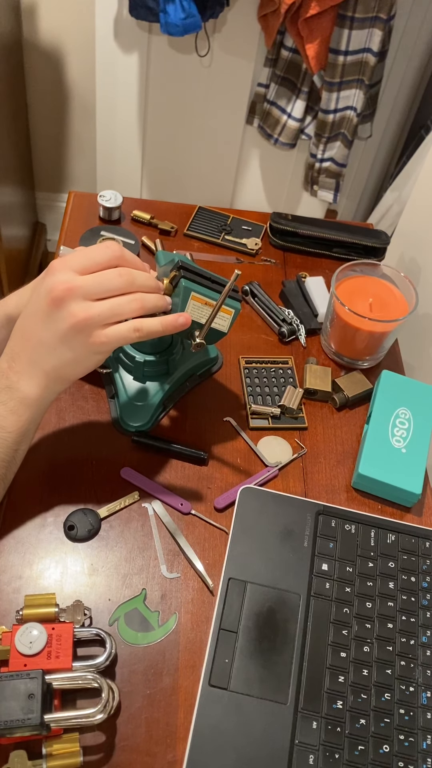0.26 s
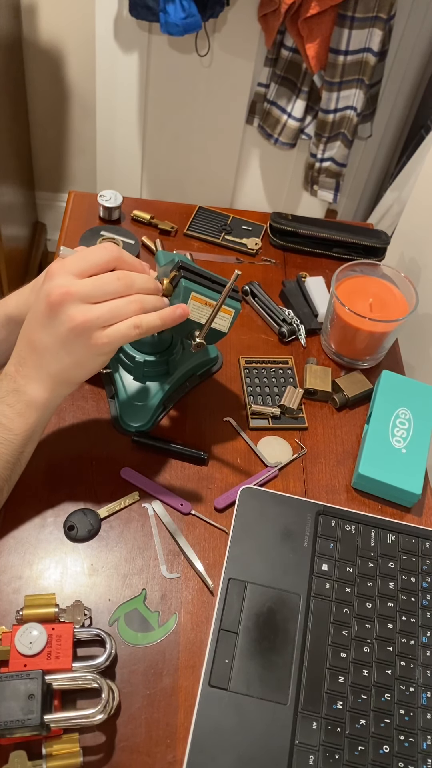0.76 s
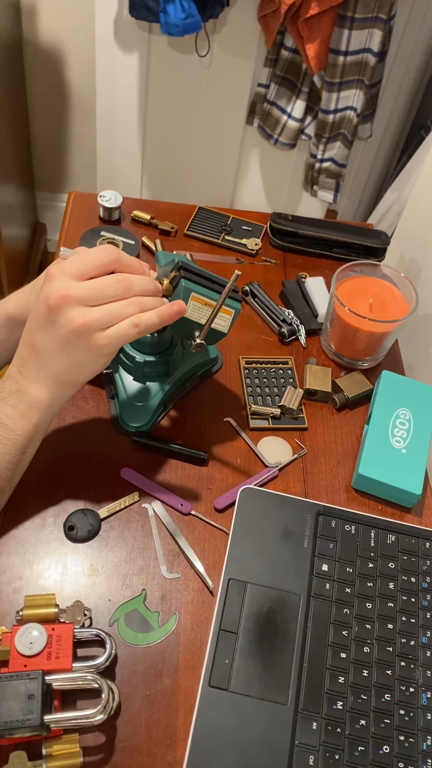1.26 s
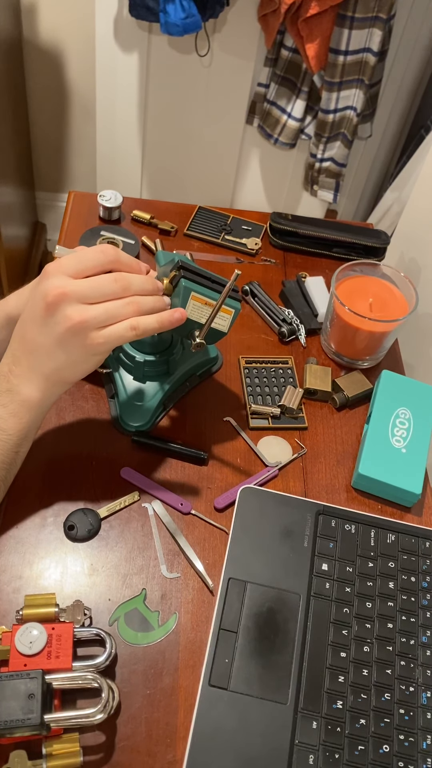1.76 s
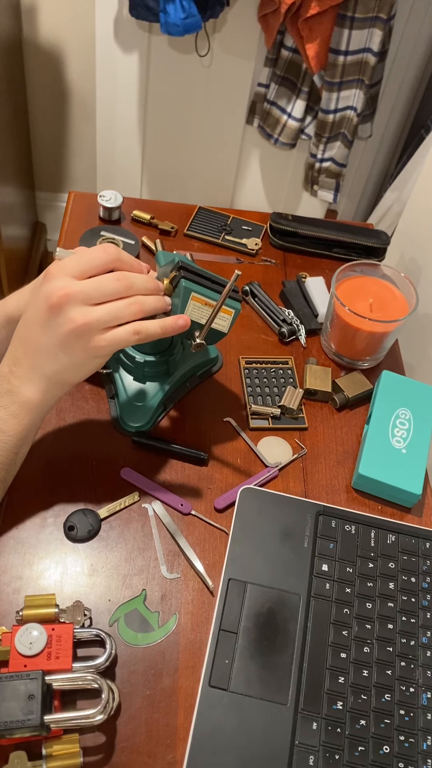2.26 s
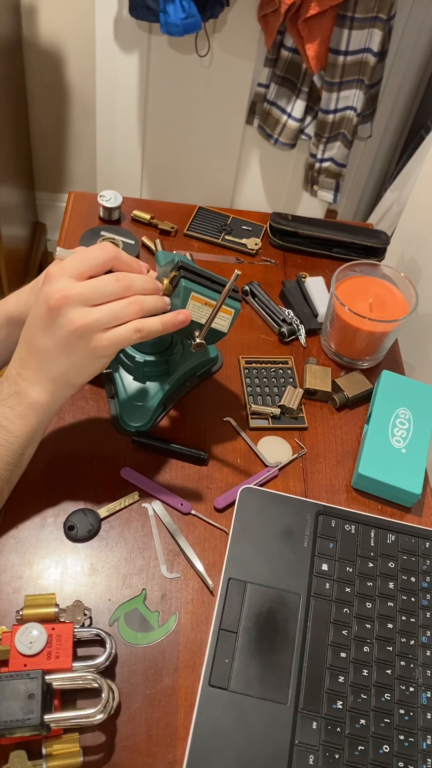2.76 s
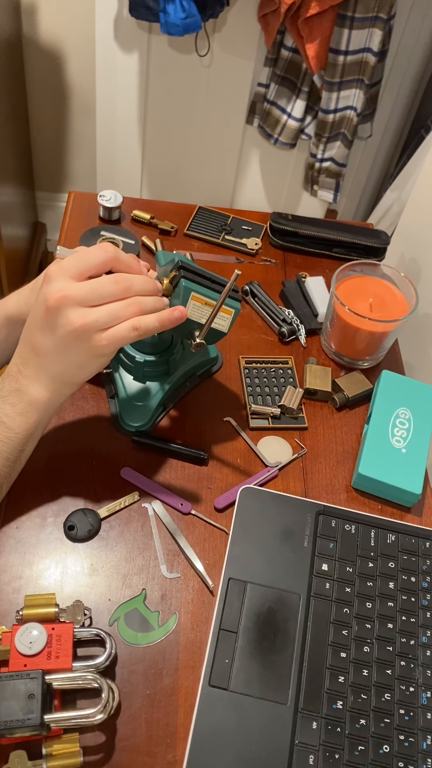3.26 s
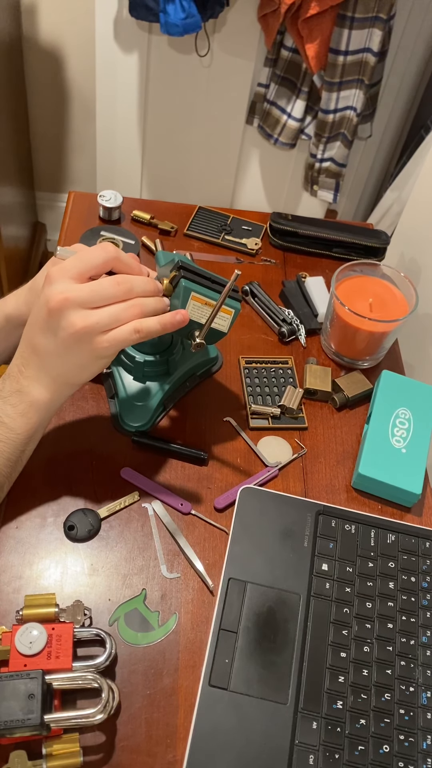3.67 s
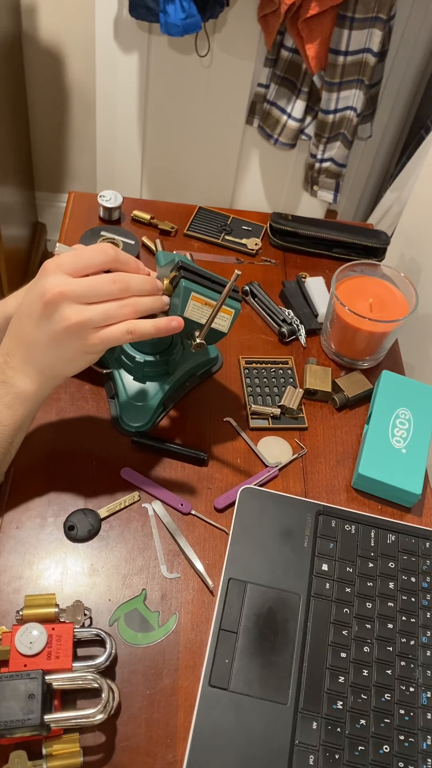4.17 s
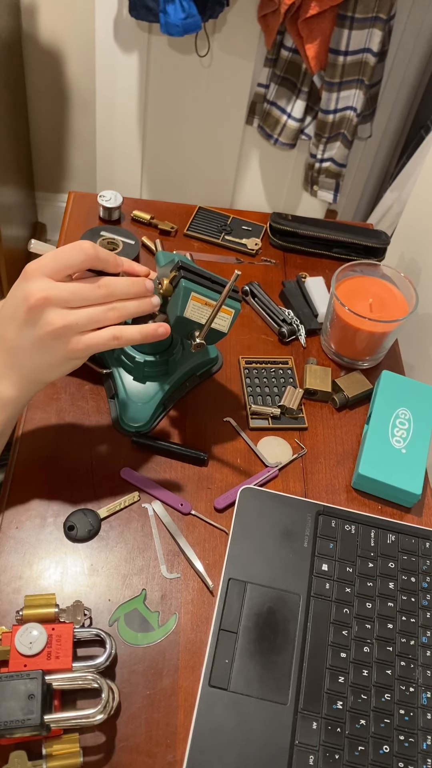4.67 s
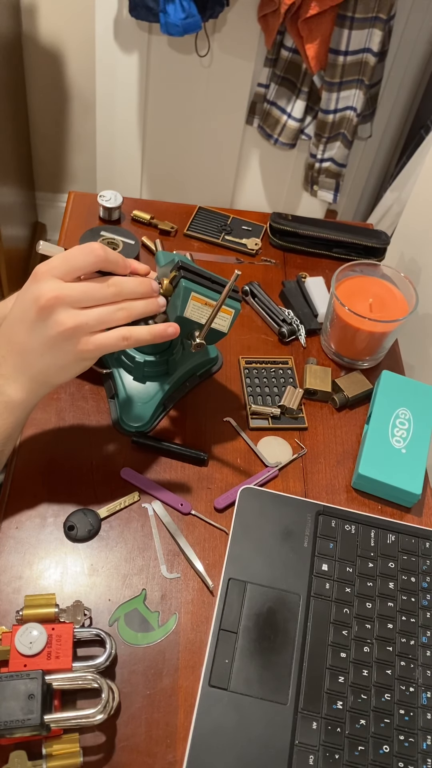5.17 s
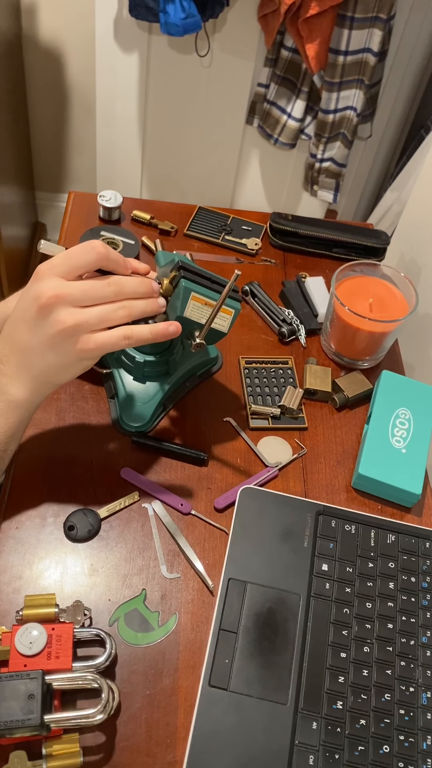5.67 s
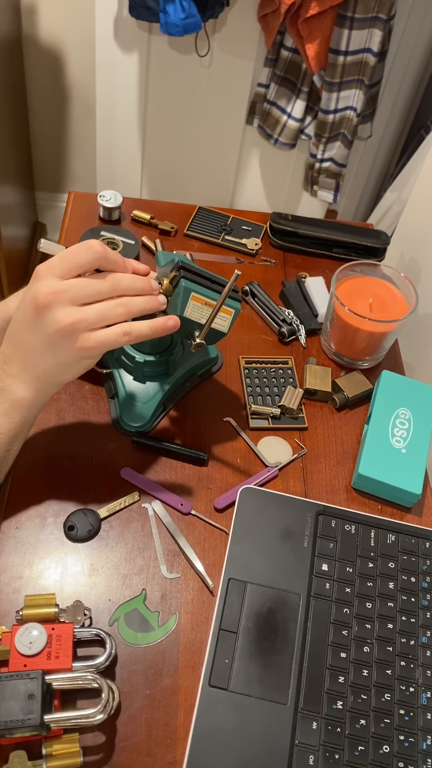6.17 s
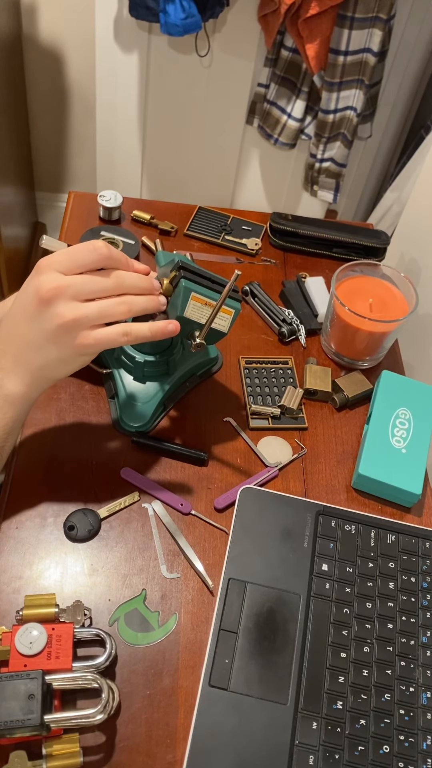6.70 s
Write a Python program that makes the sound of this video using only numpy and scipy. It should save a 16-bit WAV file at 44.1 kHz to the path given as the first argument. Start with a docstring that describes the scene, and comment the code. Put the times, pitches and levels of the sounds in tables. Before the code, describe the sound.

In a small quiet room, a low motor hum and soft airy hiss run throughout. Close by, a steel pick ticks on the brass pins of a lock held in a vise: a few faint clicks, a sharper snap at three seconds, a fine scratchy cluster past four, then a long pause and one loud metallic clack with a desk thud just after six. Small ticks follow.

```python
"""A steel pick works the pins of a lock, heard close, over soft air noise and a low motor hum that last throughout.
Pins snap and chatter as swarms of tiny impacts ringing the damped modes of pick, pins and vise.
Two drags are rains of steel grains; dull knocks are the vise foot pushing on the modes of a wooden desk.
Desk and near walls echo, and a small room rings on briefly as random taps that die band by band.
The motor is a set of wavering sines; the air is shaped stereo noise with drifting patches."""
import sys
import numpy as np
from scipy import signal
from scipy.fft import rfft, irfft, next_fast_len
from scipy.io import wavfile
from scipy.ndimage import uniform_filter1d

SR = 44100
rng = np.random.default_rng(int(sys.argv[2]) if len(sys.argv) > 2 else 0)


def wav_out(sig):
    """Save sig, one row per channel (or a flat mono array), as 16-bit PCM at SR to the path in sys.argv[1]."""
    wavfile.write(sys.argv[1], SR, np.round(np.clip(np.atleast_2d(sig).T, -1, 1) * 32767).astype(np.int16))


N = 305921

# pin clicks: t/s, chatter time scale/ms, pin level/dB (loudest 3 ms, rms), pin tilt/dB per octave,
# pick ring lift/dB, favoured low pin f/Hz, favoured high pin f/Hz, their lift/dB, ring time/share of t60,
# vise level/dB (loudest 3 ms, rms), vise tilt/dB per octave, favoured vise f/Hz
PIN_CLICKS = [(0.8644, 3.2, -72, 1, 2, 6200, 10200, 5, 1.01, -77, 6, 756),
              (0.9352, 3, -45, 0.5, 2, 6350, 15400, 8.8, 1.2, -59.5, -6, 2410),
              (1.6066, 3.9, -48.5, -4, -9, 5300, 10100, 7.4, 1.1, -53, 4, 2000),
              (1.6635, 2.8, -57, 2, -4, 6100, 10700, 5.5, 1, -64, 1, 1840),
              (1.704, 3.8, -68, -2, 0, 5500, 9500, 6.5, 0.92, -66, 5, 942),
              (1.894, 2.4, -64, -1, 2, 5500, 10200, 3.6, 0.76, -63, -1, 2040),
              (2.2082, 3.1, -52, 4, -3, 6360, 10700, 5, 1.01, -67, -1, 826),
              (2.9536, 3, -56.5, -5, -7, 6300, 15200, 6.3, 0.87, -67, 5, 1800),
              (3.0447, 2.6, -32, -2, -11, 5700, 8850, 4.2, 2, -45.5, 0.5, 4140),
              (3.0500, 3.8, -53, 7, 2, 5500, 11600, 4, 0.71, -43.5, 0.5, 2220),
              (3.056, 4.8, -60, 2, 0, 5500, 10600, 4, 0.86, -48.5, 1, 2120),
              (3.094, 3.6, -77, 5, 0, 5500, 10200, 5, 0.93, -57, 0, 1300),
              (3.099, 3.6, -75, 0, 0, 5500, 10200, 5, 1.01, -55.5, -2, 2120),
              (3.068, 4.4, -62, 0, 0, 5500, 10200, 4, 0.82, -54.5, 2, 2590),
              (4.35, 3.7, -65, 3, 2, 6200, 10200, 5, 1.01, -68, 3, 2170),
              (4.3642, 3.8, -48.5, 4, 10, 4200, 9300, 5.1, 1, -61, 4, 2500),
              (4.3686, 3, -66, 4, 2, 5500, 10200, 9, 1.2, -55.5, 0, 2020),
              (4.3878, 4.8, -47.5, 2, 2, 6400, 10000, 4.6, 0.92, -61, 1, 1190),
              (4.3990, 5.3, -49, 4, 4, 6200, 11600, 4, 0.94, -59, -6, 1890),
              (4.4105, 2.9, -59, 6, 6, 5500, 10200, 5, 1.01, -59, -8, 1260),
              (4.4195, 3.5, -54, 3, 11, 4200, 11000, 5, 1.01, -54, 9, 2000),
              (4.4258, 2.8, -43, 9.5, 8.5, 5460, 9600, 6.6, 0.7, -67, 6, 2490),
              (4.435, 3.8, -53, -4, -5, 4230, 9700, 3, 1.2, -55, 3, 900),
              (4.5338, 3.9, -50, 5, 5, 5450, 10100, 2.6, 0.91, -57, 2, 2440),
              (4.67, 4.8, -69, -1, 9, 5500, 10200, 5, 1.01, -78, -4, 837),
              (5.9255, 3.2, -71, 3, 6, 5500, 10200, 5, 1.01, -73, 1, 746),
              (6.176, 2.7, -22.5, -6.5, -3.5, 4100, 11000, 3.7, 1.3, -21, 2.5, 938),
              (6.561, 5.2, -55, 3.5, 12, 5840, 10600, 4, 1.5, -53, 0.5, 940),
              (6.5675, 3.1, -68, 4, 8, 5900, 10600, 6.6, 1.5, -55, -1, 2080),
              (6.58, 5.5, -77, -1, 15, 5500, 10600, 5, 1.5, -65, -4, 2270),
              (6.711, 2.5, -72, 4, -1, 5500, 10200, 7, 1.01, -66, 2, 2000),
              (6.737, 3.6, -48.5, 5.5, 11, 6200, 10800, 3.3, 0.59, -57.5, 6, 2230)]
# steel drags on brass, pressure builds to a peak and lets go: peak t/s, level/dB, rise/dB per s,
# fall/dB per s, vise over pins/dB, favoured vise f/Hz
STEEL_DRAGS = [(4.435, -59.5, 177, 800, -3.5, 1680), (6.174, -49, 801, 3998, 16, 3350)]
# soft knocks of the vise foot on the desk: t/s, peak level/dB, favoured desk f/Hz
DESK_KNOCKS = [(1.914, -47, 200), (3.05, -47, 216), (4.481, -47, 92), (6.178, -33.5, 244)]
# modes of steel pick and brass pins, damped by the fingers: f/Hz, level/dB, t60/s
PIN_MODES = [(4690, -5, 0.01), (5103, -1, 0.017), (5430, -2.5, 0.01), (5630, -4.5, .01), (6130, -4, 0.014),
             (6370, -1.5, 0.0081), (7300, 5, 0.0033), (8500, -1, 0.009), (8840, 0.5, 0.0074),
             (9400, -3.5, .011), (10090, 0.5, 0.0074), (10840, -1, 0.012), (11340, -4.5, 0.0071),
             (11940, -2, 0.015), (12600, -2, 0.0088), (14400, -2.5, 0.0045), (15700, -0.5, 0.0044),
             (15060, -13, 0.0061)]
# modes of the cast vise with the lock body: f/Hz, level/dB, t60/s
VISE_MODES = [(706, -10.5, 0.09), (894, 6.5, 0.017), (1293, 6.5, 0.011), (1535, -0.5, 0.016),
              (2018, 2, 0.015), (2337, -1, 0.028), (2580, -2.5, 0.0237), (2974, -1.5, 0.033),
              (3270, -5.5, 0.019), (3730, -2, 0.019), (4200, 3, 0.012), (4430, -2, 0.021)]
# the tension wrench sings when the vise is jolted: f/Hz, level under a hard-jolted vise/dB, t60/s
WRENCH_MODE = (11500, -20, 0.03)
# modes of the wooden desk top: f/Hz, level/dB, t60/s
DESK_MODES = [(92.5, -5.5, 0.23), (155.4, -4.5, 0.09), (186, 2, 0.066), (264.7, -1.5, 0.031),
              (326, 2, 0.042), (401, -5, 0.036), (514, -7, 0.056)]
# echoes off desk and near walls: delay t/s, level/dB
NEAR_ECHOES = [(.0042, -7.5), (.0085, -9), (0.0122, -25.5), (0.017, -12.5), (0.022, -15.5)]
# room decay: f/Hz, t60/s
ROOM_DECAY = [(200, 0.14), (530, 0.39), (1400, 0.25), (3700, 0.25), (9700, 0.23), (13000, 0.2),
              (15500, 0.12)]
# left-right likeness of room and air: f/Hz, likeness/-1 to 1
LIKENESS = [(60, 1.), (200, 0.83), (500, 0.026), (1000, -0.37), (2500, 0.14), (4000, 0.36), (6500, 1),
            (12000, 1)]
# motor tones, mains buzz, shaft orders and their sums: f/Hz, level/dB rms, waver/dB rms
MOTOR_TONES = [(58.2, -65, 3.5), (120.1, -58.5, .8), (157.8, -70, 1.5), (164.5, -75, 1.5),
               (188.6, -71, 1.5), (195.5, -71, 1.5), (226.4, -77, 2), (233.2, -79, 2), (271.2, -80, 2),
               (277.7, -77, 2), (339.3, -88, 2), (489.9, -89, 2), (610.5, -83, 3), (678.5, -86, 2),
               (791.5, -89, 2), (979.8, -89, 3), (1017.4, -90, 3), (2034.9, -85, 3)]
# base spectrum of the room's air noise: f/Hz, level/dB per Hz
AIR_SPECTRUM = [(24, -103), (35, -84.5), (55, -76), (100, -84), (230, -88.5), (330, -99), (640, -92.5),
                (1600, -102), (2030, -100), (3000, -104), (6000, -113), (8000, -120), (12500, -128),
                (13600, -135), (14200, -165)]
# humps in the air noise: f/Hz, width/Hz, lift/dB
AIR_HUMPS = [(957, 20, 5.5), (1385, 170, 3.5), (1890, 220, 1.5), (2750, 22, 5), (4030, 200, 2.5)]
# stereo lean of the air noise: f/Hz, left over right level/dB
AIR_LEAN = [(200, -0.5), (500, 2), (1500, 2.5), (2500, 1.5), (3500, 0)]
# phase by which the right microphone channel trails the left: f/Hz, phase/rad
RIGHT_TRAIL = [(0, 0), (2500, .5), (5300, .5), (7300, 3.14), (10400, 6.28), (13500, 9.42), (16500, 12.6)]

PICK_HZ = 5180  # the pick's own ring among the pin modes
VISE_LIFT_DB = 5.5  # the vise favours its pitch this much more than the pins do
LUCK_DB = 2.06  # chance spread of mode levels from strike to strike
WALL_RING_SHARE = 0.26  # the walls hear the lock from every side: modes smear to this share of their t60
WALL_LIFT = .45  # share of the contact point's lift that reaches the walls
HARD_JOLT_DB, WRENCH_FADE = -26, 0.4  # below a hard jolt the wrench loses this many extra dB per dB
GRIT_PER_S = 1000
KNOCK_LIFT_DB, KNOCK_WALL_DB = 11, -1  # lift of the favoured desk pitch; level to the walls against straight
ROOM_DB = -2
MIC_TOP_HZ, EDGE_HZ = 16100, 16300  # soft and steep ends of the treble


def gain_of(db):
    """Decibels to amplitude."""
    return 10 ** (np.asarray(db) / 20)


def read(points, hz):
    """Reads a table along log frequency."""
    f, value = np.transpose(points)
    return np.interp(np.log(hz + 1), np.log(f + 1), value)


def add(mix, s, sound):
    """Mixes a sound in at s seconds."""
    part = mix[:, round(s * SR):][:, :sound.shape[-1]]
    part += sound[..., :part.shape[1]]


def lock():
    """All clicks, drags and desk knocks: row 0 is the straight sound, row 1 what goes to the walls."""
    out = np.zeros((2, N))
    luck = rng.standard_normal((len(PIN_CLICKS), 3, 600))
    for (s, *row), click_luck in zip(PIN_CLICKS, luck):
        add(out, s - .001, click(row, click_luck))
    for row in STEEL_DRAGS:
        add(out, *drag(*row))
    for s, db, hz in DESK_KNOCKS:
        add(out, s, knock(db, hz))
    return out


def click(row, luck):
    """A pin snaps and chatters: a swarm of tiny impacts rings pins, vise and wrench, straight and to the walls."""
    (chatter_ms, pin_db, pin_tilt, pick_db, low_hz, high_hz, lift_db, ring_share,
     vise_db, vise_tilt, vise_hz) = row
    impacts = chatter(chatter_ms, luck[2])
    pin_lifts = [(PICK_HZ, pick_db, .05), (low_hz, lift_db, .06), (high_hz, lift_db, .045)]
    vise_lifts = [(vise_hz, VISE_LIFT_DB + lift_db, .16), (low_hz, lift_db, .1)]
    pin = even_level(struck(impacts, PIN_MODES, pin_tilt, pin_lifts, luck[0], ring_share))
    vise = even_level(struck(impacts, VISE_MODES, vise_tilt, vise_lifts, luck[1], ring_share))
    wrench = even_level(struck(impacts, [WRENCH_MODE], 0, [], luck[1], 0.75))
    wrench_db = WRENCH_MODE[1] + WRENCH_FADE * (vise_db - HARD_JOLT_DB)
    vise = np.roll(vise, 20, axis=1)  # the vise answers about half a millisecond late
    return gain_of(pin_db) * pin + gain_of(vise_db) * (vise + gain_of(wrench_db) * wrench)


def chatter(chatter_ms, noise):
    """A swarm of impacts that swells and dies, and drives every pitch about equally."""
    u = np.arange(600) / SR * 1000 / chatter_ms
    swarm = u ** 1.37 * np.exp(-2.5 * u)
    impacts = noise * swarm
    for _ in range(4):  # flatten the spectrum, then put the swarm's shape back
        spectrum = rfft(impacts)
        impacts = irfft(spectrum / abs(spectrum), len(u)) * np.sqrt(swarm)
    return impacts


def struck(impacts, modes, tilt_db, lifts, luck, ring_share):
    """Impacts through one object; towards the walls its favoured pitches even out and its ring smears short."""
    wall_lifts = [(f, WALL_LIFT * lift, width) for f, lift, width in lifts]
    straight = ring(modes, tilt_db, lifts, luck, ring_share)
    to_walls = ring(modes, tilt_db, wall_lifts, luck, WALL_RING_SHARE)
    return signal.fftconvolve(impacts[None], [straight, to_walls], axes=1)


def even_level(x):
    """Scales both rows so the straight sound's loudest 3 ms has unit rms."""
    return x / np.sqrt(uniform_filter1d(x[0] ** 2, 130).max())


def ring(modes, tilt_db, lifts, luck, share=1.):
    """Dying sines of a struck object; the contact point favours modes near some pitches (Hz, dB, octaves)."""
    hz, db, t60 = np.transpose(modes)[:, :, None]
    t = np.arange(4096) / SR
    db = db + tilt_db * np.log2(hz / np.median(hz)) + LUCK_DB * luck[:len(modes), None]
    for f, lift, width in lifts:
        db = db + lift * np.exp(-(np.log2(hz / f) / width) ** 2)
    sign = (-1) ** np.arange(len(modes))[:, None]  # neighbouring modes move in opposite senses
    decay = gain_of(db - 60 * t / (t60 * share))
    sound = (sign * decay * np.sin(2 * np.pi * hz * t)).sum(0) / np.sqrt(share)
    # a small object radiates little below its lowest mode
    return signal.sosfilt(signal.butter(2, 0.59 * hz.min(), "high", fs=SR, output="sos"), sound)


def drag(peak_s, db, rise_db, fall_db, vise_db, vise_hz):
    """Separate grains of steel catch on brass at random moments, heard through pins and vise."""
    t = np.arange(-6000, 3000) / SR  # around the peak
    when, sign = rng.random((len(t), 2)).T
    grit = (when < GRIT_PER_S / SR) * np.sign(sign - .5)
    pressure = gain_of(db + np.minimum(rise_db * t, -fall_db * t))
    no_luck = np.zeros(20)
    pins = ring(PIN_MODES, -1.45, [(PICK_HZ, -1, .1)], no_luck)
    vise = ring(VISE_MODES, -0.65, [(vise_hz, 7.3, .3)], no_luck)
    body = pins + gain_of(vise_db) * vise
    sound = signal.fftconvolve(grit * pressure, body)
    return peak_s + t[0], sound / grit.std() / np.linalg.norm(body)


def knock(db, hz):
    """The padded vise foot pushes the desk top for about a millisecond and its modes thud."""
    push = np.hanning(60)
    desk = ring(DESK_MODES, 0, [(hz, KNOCK_LIFT_DB, .16)], rng.standard_normal(len(DESK_MODES)))
    thud = np.convolve(push, desk)
    return gain_of([[db], [db + KNOCK_WALL_DB]]) * thud / abs(thud).max()


def echoes(sent):
    """Desk and near walls throw back delayed copies."""
    return sum(gain_of(db) * np.roll(sent, round(s * SR)) for s, db in NEAR_ECHOES)


def stereo(left, other, hz):
    """Builds a right channel that is as like the left as the likeness table says at each pitch."""
    same = read(LIKENESS, hz)[:, None]
    return np.array([left, same * left + np.sqrt(1 - same ** 2) * other])


def room(x):
    """Small-room tail: sparse taps of random sign, each band dying at its own speed."""
    taps = np.zeros((2, SR // 2))
    at = np.arange(160, SR // 2 - 20, 20)
    at = at + rng.integers(0, 20, (2, len(at)))
    np.put_along_axis(taps, at, rng.choice([-1., 1.], at.shape), 1)
    hz, t, z = signal.stft(taps, SR, nperseg=256)
    decay = gain_of(-60 * t / read(ROOM_DECAY, hz)[:, None])
    tail = signal.istft(stereo(z[0], z[1], hz) * decay, SR, nperseg=256)[1]
    return signal.fftconvolve(x[None], tail / np.linalg.norm(tail[0]), axes=1)[:, :N]


def hum():
    """Far motor: steady tones whose levels waver slowly."""
    t, out = np.arange(N) / SR, np.zeros(N)
    slow = t[::256]
    for hz, db, waver_db in MOTOR_TONES:
        waver = sum(np.sin(2 * np.pi * (f * slow + rng.random())) for f in (.4, .9, 1.9, 3.7)) / np.sqrt(2)
        level = gain_of(db + waver_db * np.interp(t, slow, waver))
        out += np.sqrt(2) * level * np.sin(2 * np.pi * (hz * t + rng.random()))
    return out


def air():
    """Smooth air noise, alike in both channels in the bass and treble, with faint drifting patches."""
    frames, hz = N // 512 + 5, np.fft.rfftfreq(2048, 1 / SR)
    a, b, c, d, patches = rng.standard_normal((frames, 1025, 5)).T
    patches = uniform_filter1d(uniform_filter1d(patches, 20, 0), 6, 1)
    patch_gain = gain_of(1.3 * patches / patches.std())
    z = stereo(a + 1j * b, c + 1j * d, hz)
    z *= gain_of(np.outer([.5, -.5], read(AIR_LEAN, hz)))[:, :, None]
    humps = sum(db * np.exp(-((hz - f) / width) ** 2) for f, width, db in AIR_HUMPS)
    colour = gain_of(read(AIR_SPECTRUM, hz) + humps)
    z = z * colour[:, None] * patch_gain
    out = signal.istft(z, nperseg=2048, noverlap=1536)[1][:, :N]
    return out * np.sqrt(np.trapezoid(colour ** 2, hz) / np.mean(out ** 2))  # power set by the spectrum


def scene():
    """Lock, its echoes, room, air and hum."""
    near, sent = lock()
    return near + echoes(sent) + gain_of(ROOM_DB) * room(sent) + air() + hum()


def record(dry):
    """Microphone pair: the right channel turns in phase against the left, then bass and treble are limited."""
    size = next_fast_len(N + 2048)
    turn = np.interp(np.fft.rfftfreq(size, 1 / SR), *np.transpose(RIGHT_TRAIL))
    half_turns = np.exp(.5j * np.outer([1, -1], turn))  # half the phase on each side
    pair = irfft(rfft(dry, size) * half_turns, size)[:, :N]
    # the microphone drops the deepest bass and dulls the top
    pair = signal.sosfilt(signal.butter(2, 38, "high", fs=SR, output="sos"), pair)
    pair = signal.sosfilt(signal.butter(4, MIC_TOP_HZ, fs=SR, output="sos"), pair)
    edge = signal.firwin(161, EDGE_HZ, window=("kaiser", 9), fs=SR)
    return signal.oaconvolve(pair, edge[None], "same")


dry = scene()
out = record(dry)
wav_out(out)
```